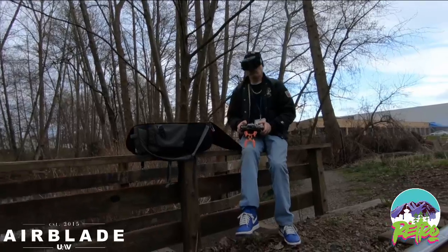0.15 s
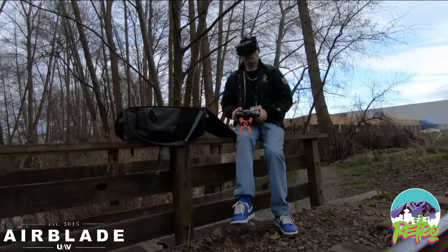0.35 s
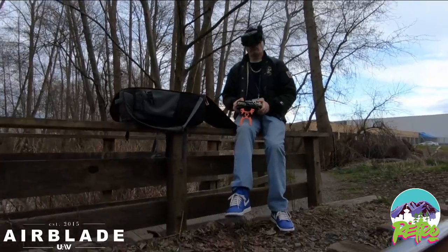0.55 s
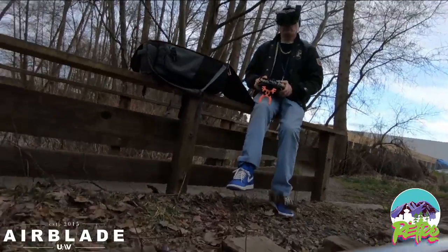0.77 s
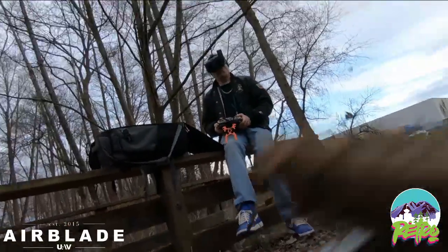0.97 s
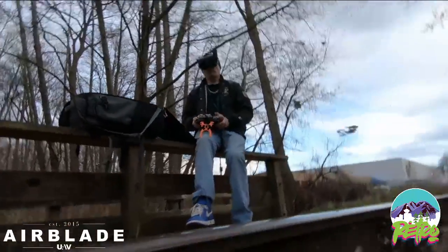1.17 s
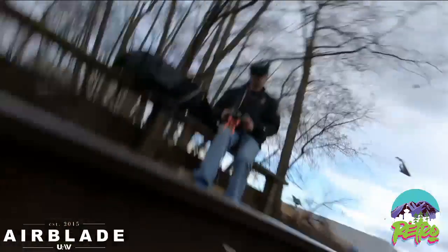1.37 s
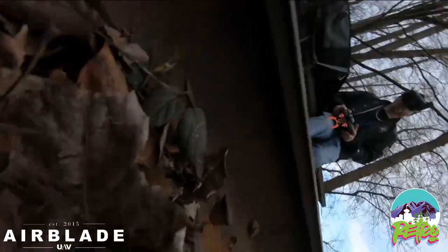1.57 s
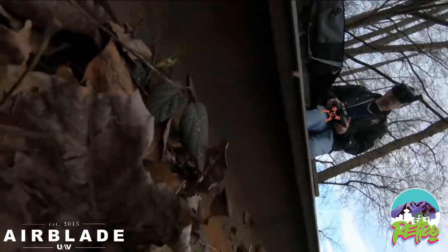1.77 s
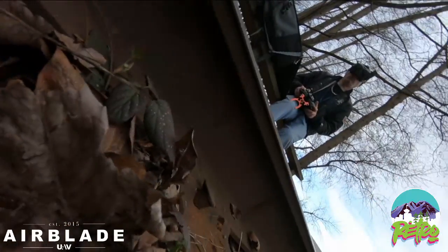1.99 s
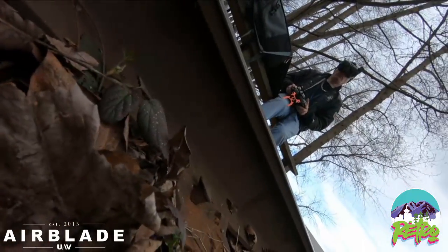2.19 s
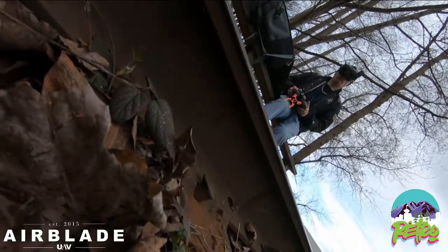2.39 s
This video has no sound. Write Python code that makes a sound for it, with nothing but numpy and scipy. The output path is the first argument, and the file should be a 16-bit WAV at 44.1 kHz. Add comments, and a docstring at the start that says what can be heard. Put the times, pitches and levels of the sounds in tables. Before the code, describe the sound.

Small four-motor drone hums close by, clips something, spins down and thuds into dry rustling leaves.

```python
"""Woodland path: a small four-motor drone, heard from its own camera, hovers low; a second one flies past.
Two-blade rotors beat as sines at multiples of shaft speed, with chopped noise for air and plain noise for wash.
It grazes something, the motors fight and spin down, and it knocks on the ground: noise bursts, ringing modes.
It slides into dry leaves, which crackle as random grains and single snaps over a low rumble while it settles."""
import sys
import numpy as np
from scipy import signal
from scipy.fft import rfft, irfft
from scipy.io import wavfile
from scipy.ndimage import uniform_filter1d

SR = 44100
rng = np.random.default_rng(int(sys.argv[2]) if len(sys.argv) > 2 else 0)


def materialize(psi):
    """Save the field psi as 16-bit PCM at rate SR to the path in sys.argv[1].

    A 1-D psi becomes a single channel; in a 2-D psi each row is a channel.
    """
    bounded = np.clip(np.atleast_2d(psi).T, -1, 1)
    quanta = np.round(bounded * 32767).astype(np.int16)
    wavfile.write(sys.argv[1], SR, quanta)


N = 107559
T = np.arange(N) / SR

# Spectra are relative: colour() normalises their power.
# second drone: [t/s, blade tone f/Hz before jitter, level/dB]
OTHER_DRONE = [(.78, 471, -66), (.88, 493.4, -45), (.95, 498.6, -39.5), (1, 474, -50.5), (1.05, 432.5, -34),
               (1.1, 450, -52.5), (1.15, 450, -70.5)]
# prop wash spectrum: [f/Hz, density/dB]
WASH_SPECTRUM = [(25, -12), (60, -14), (110, -9), (180, 9), (270, -1.5), (450, 13), (650, -9), (1000, -17),
                 (3000, -38), (15000, -85)]
# gusts of wash and bumps on the camera: [t/s, rise/s, decay/s, level/dB]
BUMPS = [(0.939, 0.044, .018, -37.5), (1.1, .015, .02, -34.5), (1.191, 0.016, .03, -41),
         (1.275, .012, .01, -40.5), (1.51, .012, 0.031, -42)]
# gust spectrum at the microphone: [f/Hz, density/dB]
GUST_SPECTRUM = [(25, -4.5), (60, 0.5), (100, -3.5), (160, -5.5), (260, -10), (480, -20.5), (1000, -36.5),
                 (5000, -68), (15000, -90)]

# sliding and settling in leaves: [t/s, rustle level/dB before jitter, frame rumble level/dB]
SLIDE = [(1.33, -58, -53), (1.352, -45.5, -23.5), (1.385, -55.5, -40), (1.445, -56.5, -62),
         (1.458, -39.5, -44.5), (1.495, -39, -38), (1.512, -50, -46.5), (1.56, -58.5, -56),
         (1.65, -61, -55.5), (1.73, -66, -60), (1.76, -72.5, -62), (1.84, -72, -56.5), (1.9, -62.5, -59.5),
         (2.02, -68.5, -59.5), (2.14, -70, -63), (2.22, -86, -67.5), (2.28, -90, -69.5),
         (2.33, -87.5, -63.5), (2.44, -84, -62)]
# single leaf snaps: [t/s, snap level/dB, low thump level/dB, snap decay/s]
SNAPS = [(1.486, -43, -55, .002), (1.491, -33.5, -51, .002), (1.518, -40, -63, .002),
         (1.592, -50.5, -55, 0.0027), (1.664, -44.5, -65, 0.0015), (1.676, -40, -55, 0.0027),
         (1.701, -50, -65, 0.0023), (1.721, -51.5, -62, 0.0023), (1.787, -57.5, -66, 0.0054),
         (1.881, -55.5, -64, .004), (1.895, -55.5, -74, .003), (1.91, -64, -75, 0.0018),
         (1.944, -48.5, -46.5, 0.004), (2.069, -51.5, -75, 0.0025), (2.126, -48, -43.5, 0.0026),
         (2.152, -59.5, -68.5, 0.0043), (2.323, -76.5, -68, .002), (2.377, -69.5, -70.5, .002)]
# rustling leaf spectrum: [f/Hz, density/dB]
LEAF_SPECTRUM = [(200, -4), (500, 7), (1000, -12.5), (2000, -4), (3200, 0.5), (4500, -1.5), (6000, 3.5),
                 (8000, -6), (10000, -20), (12000, -38.5), (15000, -37.5)]
# snapping leaf spectrum: [f/Hz, density/dB]
SNAP_SPECTRUM = [(200, -13), (600, -15), (1200, -13), (2400, -7), (4300, 0), (5300, 2), (6400, 5.5),
                 (8000, -8.5), (10000, -21), (12000, -38), (15000, -37)]
# low frame rumble spectrum: [f/Hz, density/dB]
RUMBLE_SPECTRUM = [(25, -1), (60, 2.5), (100, 2.5), (200, 2), (300, -13.5), (480, -14), (700, -29),
                   (1500, -33.5), (6000, -48.5), (12000, -58.5)]

# sliding frame hum: [t/s, level/dB]
SCRAPE = [(1.36, -80), (1.385, -50.5), (1.44, -50), (1.48, -58), (1.52, -62), (1.6, -77)]
# frame modes: [f/Hz, relative level/dB, t60/s]; strikes detune them slightly
FRAME_MODES = [(310, -2, 0.042), (464, 4, 0.08), (574, -4.5, 0.013), (657, -11, 0.092)]
# camera on its soft mount, modes: [f/Hz, relative level/dB, t60/s]; strikes detune them slightly
MOUNT_MODES = [(57.3, -6, .06), (134.3, -4.5, .05), (190, -1, 0.06)]
# knocks, first is the graze: [t/s, thud and mount level/dB, crack level/dB, frame ring level/dB, crack decay/s]
KNOCKS = [(1.07, -55.5, -29.5, -44.5, 0.0096), (1.3557, -22, -36, -37.5, 0.0018),
          (1.363, -23, -25, -32, .0012), (1.366, -25.5, -41, -35, 0.0016), (1.401, -51, -64, -38.5, 0.0058),
          (1.427, -57, -35.5, -34, 0.0055), (1.432, -61, -37, -33.5, .003)]
# dull thud spectrum: [f/Hz, density/dB]
THUD_SPECTRUM = [(25, -3), (60, 0), (100, -4), (160, 10), (240, -8.5), (480, -12.5), (800, -20.5),
                 (1500, -33), (5000, -60), (15000, -90)]
# crack spectrum: [f/Hz, density/dB]
CRACK_SPECTRUM = [(200, -2), (600, 3), (1200, -3), (2600, -0.5), (5500, -4), (8000, -11), (11000, -38),
                  (15000, -60)]

# shaft speeds before wobble and braking: [t/s, speed/(turns/s)]
SPEED_A = [(0, 179), (.11, 176), (.23, 182), (.31, 191.5), (.36, 190.5), (.45, 193), (.57, 194),
           (.61, 188.7), (.68, 192.5), (.75, 192.5), (.78, 197.5), (.84, 198.7), (.885, 206.5),
           (.93, 205.5), (.98, 196.5), (1.09, 196.5), (1.13, 184), (1.19, 192), (1.265, 168)]
SPEED_B = [(0, 198.9), (0.091, 200.7), (0.189, 199.3), (.25, 189.1), (0.312, 186.7), (0.428, 195.5),
           (0.479, 190), (0.539, 191.6), (0.599, 187.4), (0.719, 187.2), (.78, 179.5), (.88, 172.9),
           (1, 189.4), (1.05, 199.4), (1.15, 172), (1.191, 129.3), (1.264, 115.5)]
SPEED_C = [(0, 211.9), (0.099, 217), (0.261, 210.1), (0.299, 203.9), (.48, 202), (0.681, 195), (.86, 200),
           (0.998, 196), (1.06, 207.2), (1.11, 185.5), (1.17, 217.2), (1.211, 234.5), (1.264, 213.8)]
SPEED_D = [(0, 178), (.3, 176), (.42, 182), (.6, 181), (.8, 186), (.9, 184), (1, 180), (1.09, 170),
           (1.15, 210), (1.19, 308), (1.215, 330), (1.265, 270)]
# motor tones at the microphone, before jitter and braking: [t/s, blade tone level/dB, third blade harmonic level/dB]
TONES_A = [(0, -25, -58), (.2, -24.5, -51), (.33, -30, -48.5), (.6, -29.5, -50), (.9, -29.5, -50),
           (1.05, -30.5, -47), (1.09, -36.5, -52.5), (1.14, -27, -51.5), (1.2, -34.5, -58),
           (1.26, -29.5, -55.5)]
TONES_B = [(0, -40, -40), (.18, -34.5, -43), (0.302, -37.5, -45.5), (.5, -34, -44), (.7, -44, -50.5),
           (.9, -36.5, -45.5), (1.12, -38.5, -45.5), (1.2, -38, -64), (1.26, -37, -53.5)]
TONES_C = [(0, -34, -43), (.15, -47.5, -40.5), (.33, -40, -45.5), (.6, -44, -53.5), (.9, -40, -56.5),
           (1.06, -43.5, -50), (1.15, -39, -46.5), (1.205, -24, -58.5), (1.26, -37, -50.5)]
TONES_D = [(0, -52, -66), (.4, -33, -58.5), (.7, -43, -64), (1, -42.5, -53), (1.1, -46, -45.5),
           (1.16, -42, -49), (1.21, -52, -38.5), (1.26, -50.5, -42.5)]
# base levels, one row a motor: [shaft tone level/dB, overtone group level/dB, buzz trim/dB]
MOTOR_LEVELS = [(-59.5, -53.5, -2), (-63, -62.5, -1.5), (-60.5, -64, 0), (-57, -58, -2.5)]
# overtones: [order/(multiple of shaft speed), level/dB relative to the group]
OVERTONES = [(3, -3), (4, -2), (8, -11.5)]
# motor whine: [order/(multiple of shaft speed), level/dB before treble]
WHINE = [(18, -51), (24, -53.5)]
# bearing whine of motor A, before jitter and braking: [t/s, level/dB]
BEARING = [(0, -47.5), (.25, -47), (.45, -41.5), (.8, -40), (.9, -39.5), (.98, -37.5), (1.06, -36.5),
           (1.12, -41.5), (1.17, -57)]
# whine and buzz trim: [t/s, level/dB]
TREBLE = [(0, -1), (.27, -0.5), (.42, 1), (.8, 1), (1.04, .5), (1.08, 4), (1.13, 2), (1.2, 1.5),
          (1.26, -0.5), (1.3, -3)]
# buzz and chopped air spectrum: [f/Hz, density/dB]
BUZZ_SPECTRUM = [(500, -20), (900, -16), (1600, -14.5), (2000, -9.5), (2400, 0), (3300, 1), (4600, 1),
                 (5200, -2.5), (6500, -4), (8000, -12.5), (10000, -25), (12000, -45), (15000, -51.5)]
# motor bell resonances: [f/Hz, density/dB]
BELL_SPECTRUM = [(1000, -20), (2000, -9.5), (3200, -7.5), (4100, -2.5), (4800, -8.5), (5500, -2),
                 (6100, -11), (8000, -12), (10000, -34), (14000, -60)]
# whine of a motor driven hard: [order/(multiple of shaft speed), level/dB before bell and trim]
STRAIN = [(12, -44.5), (17, -39), (18, -39.5)]
# magnet cogging: [order/(multiple of shaft speed), level/dB before bell and trim]
COGGING = [(42, -55.5), (84, -47.5)]

WASH_MEAN_DB = -46
BASE_GRAINS_PER_S, SLIDE_GRAINS_PER_S, FULL_SLIDE_DB = 990, 8100, -42.5
GRAIN_SPREAD_DB, SMOOTH_SHARE = 2.5, .1
SCRAPE_Q = 11
THUD_DECAY_S, THUD_NOISE_TRIM_DB = .0065, -6
# wobble: rms fraction of shaft speed
WOBBLE, UPSET_WOBBLE, UPSET_RAMP_S = .002, .016, .057
CUT_S, BRAKE_S, STOP_S = 1.26, .031, 1.35
SPEED_POWER = 1.3  # loudness exponent of braking
FLUTTER_RMS_DB = 4
BUZZ_BASE_DB, AIR_BASE_DB, CHOP_DEPTH = -45, -42.5, .75
BEARING_ORDER = 15.32
STRAIN_FROM_TURNS_PER_S, STRAIN_SPAN_TURNS_PER_S, STRAIN_TRIM_DB = 215, 80, -8
TOP_HZ = 15100


def undb(db):
    """Decibels to gain."""
    return 10 ** (np.asarray(db) / 20)


def unit(x):
    """Scale to rms 1."""
    return x / np.sqrt(np.mean(x ** 2) + 1e-18)


def curve(rows, axis=1):
    """Linear interpolation of one table column over time."""
    rows = np.array(rows)
    return np.interp(T, rows[:, 0], rows[:, axis])


def ramp(start_s, span_s):
    """Linear 0 to 1 from the start over the span."""
    return np.clip((T - start_s) / span_s, 0, 1)


def fade_out(end_s, span_s):
    """Linear 1 to 0 over the span before the end."""
    return np.clip((end_s - T) / span_s, 0, 1)


def walk(rate_hz):
    """Smoothed sample-and-hold chance, rms 1."""
    k = max(int(SR / rate_hz), 1)
    held = rng.standard_normal(2000)[np.arange(N) // k]
    return unit(uniform_filter1d(held, k))


def colour(x, spectrum):
    """Minimum-phase filter with the given spectrum; white noise keeps its power."""
    hz, db = np.array(spectrum).T
    size = 4096
    bins_hz = np.arange(size // 2 + 1) * SR / size
    gain = unit(undb(np.interp(np.log(bins_hz + 1), np.log(hz), db)))
    # folding the cepstrum makes the response causal
    cepstrum = irfft(np.log(gain))
    cepstrum[1:size // 2] *= 2
    cepstrum[size // 2 + 1:] = 0
    impulse = irfft(np.exp(rfft(cepstrum)))
    return signal.fftconvolve(x, impulse)[:N]


def noise():
    """White noise, rms 1."""
    return rng.standard_normal(N)


def burst(at_s, decay_s, rise_s=.00033):
    """Envelope with exponential swell to 1 and exponential decay."""
    return np.exp(np.minimum((T - at_s) / rise_s, (at_s - T) / decay_s))


def ring(at_s, modes):
    """Damped sines of a body struck at a moment, each slightly detuned."""
    age = np.maximum(T - at_s, 0)
    total = np.zeros(N)
    for hz, db, t60 in modes:
        struck_hz = hz * (1 + .0067 * rng.standard_normal())
        decay = np.exp(-np.log(1000) * age / t60)
        total -= undb(db) * np.sin(2 * np.pi * struck_hz * age) * decay
    return total


def other_drone():
    """Blade tone of a second drone: one sine gliding and swelling as it goes by."""
    hz = curve(OTHER_DRONE) * (1 + .013 * walk(73))
    tone = np.sqrt(2) * np.sin(2 * np.pi * np.cumsum(hz) / SR)
    fade = ramp(OTHER_DRONE[0][0], .02) * fade_out(OTHER_DRONE[-1][0], .02)
    return tone * undb(curve(OTHER_DRONE, axis=2)) * fade


def prop_wash():
    """Downwash buffeting the microphone: low noise of wandering level."""
    level = undb(WASH_MEAN_DB + 4.5 * walk(4))
    return level * colour(noise(), WASH_SPECTRUM) * fade_out(1.34, .056)


def camera_bumps():
    """Gusts and bumps on the camera: swelling bursts of low noise."""
    envelope = sum(undb(db) * burst(at, decay, rise) for at, rise, decay, db in BUMPS)
    return envelope * colour(noise(), GUST_SPECTRUM)


def leaf_rustle():
    """Dry leaves scraping: random impulses, denser as the slide gets louder, over a little smooth noise."""
    slide_share = np.minimum(undb(curve(SLIDE) - FULL_SLIDE_DB), 1)
    rate = BASE_GRAINS_PER_S + SLIDE_GRAINS_PER_S * slide_share
    sizes = undb(GRAIN_SPREAD_DB * np.minimum(rng.exponential(size=N), 4))
    hits = (rng.random(N) < rate / SR) * np.sign(noise())
    grains = unit(hits * sizes / np.sqrt(rate))  # power independent of density
    rustle = (grains + SMOOTH_SHARE * noise()) * undb(curve(SLIDE) + 1.5 * walk(100))
    return colour(rustle, LEAF_SPECTRUM)


def frame_rumble():
    """Low rumble of the frame in the leaves, with a thump at each snap."""
    thumps = sum(undb(db) * burst(at, .0044) for at, _, db, _ in SNAPS)
    return (undb(curve(SLIDE, axis=2)) + thumps) * colour(noise(), RUMBLE_SPECTRUM)


def leaf_snaps():
    """Single leaves snapping: short bright noise bursts."""
    envelope = sum(undb(db) * burst(at, decay, rise_s=.0013) for at, db, _, decay in SNAPS)
    return colour(envelope * noise(), SNAP_SPECTRUM)


def leaves():
    """Rustle, rumble and snaps as the frame slides and settles."""
    return leaf_rustle() + frame_rumble() + leaf_snaps()


def scrape():
    """Friction keeps the frame's modes ringing: noise through resonators."""
    drive = noise()
    body = np.zeros(N)
    for hz, db, _ in FRAME_MODES:
        body += undb(db) * signal.lfilter(*signal.iirpeak(hz, SCRAPE_Q, fs=SR), drive)
    return unit(body) * undb(curve(SCRAPE)) * fade_out(SCRAPE[-1][0], .04)


def crash():
    """Each contact thumps the camera, cracks and rings the frame."""
    thuds, cracks, rings = np.zeros((3, N))
    for at, thud_db, crack_db, ring_db, decay in KNOCKS:
        thuds += undb(thud_db + THUD_NOISE_TRIM_DB) * burst(at, THUD_DECAY_S)
        cracks += undb(crack_db) * burst(at, decay)
        rings += undb(thud_db) * ring(at, MOUNT_MODES)
        rings += undb(ring_db) * ring(at, FRAME_MODES)
    return colour(thuds * noise(), THUD_SPECTRUM) + colour(cracks * noise(), CRACK_SPECTRUM) + rings


def shaft(speeds):
    """Rotor speed, angle and braking: it hunts after the graze and brakes hard once the throttle is cut."""
    brake = np.exp(-np.clip(T - CUT_S, 0, .3) / BRAKE_S)
    wobble = WOBBLE + UPSET_WOBBLE * ramp(KNOCKS[0][0], UPSET_RAMP_S)
    steady = uniform_filter1d(curve(speeds), SR // 80, mode="nearest")
    speed = steady * (1 + wobble * walk(110)) * brake
    turn = 2 * np.pi * (np.cumsum(speed) / SR + rng.random())
    return speed, turn, brake


def tone(turn, order):
    """Sine locked to a multiple of the shaft angle, rms 1, random phase."""
    return np.sqrt(2) * np.sin(order * turn + 2 * np.pi * rng.random())


def flutter():
    """Random level flutter of one partial."""
    return undb(FLUTTER_RMS_DB * walk(35.11))


def partials(turn, rows):
    """Sum of shaft-locked tones, each fluttering on its own."""
    return sum(undb(db) * tone(turn, order) * flutter() for order, db in rows)


def blade_tones(speed, turn, tones, shaft_db, overtone_db):
    """Two blades sound at twice shaft speed, with harmonics; the shaft tone grows at high speed."""
    blade = undb(curve(tones) + 1.1 * walk(30)) * tone(turn, order=2)
    third = undb(curve(tones, axis=2)) * tone(turn, order=6)
    overspeed = np.maximum(speed / 192, 1) ** 1.8
    once_a_turn = undb(shaft_db) * tone(turn, order=1) * flutter() * overspeed
    return blade + third + once_a_turn + undb(overtone_db) * partials(turn, OVERTONES)


def whine_and_buzz(turn, buzz_db):
    """Motor whine, a comb of high shaft harmonics, and air noise chopped by the blades."""
    # odd orders lie 4 dB lower
    comb = sum(tone(turn, k) * flutter() * undb(-4. * (k % 2)) for k in range(7, 64))
    air = noise() * (1 + CHOP_DEPTH * np.cos(2 * turn))
    mix = undb(BUZZ_BASE_DB) * unit(comb) + undb(AIR_BASE_DB) * unit(air)
    buzz = undb(buzz_db) * colour(mix, BUZZ_SPECTRUM)
    return (partials(turn, WHINE) + buzz) * undb(curve(TREBLE))


def strain(speed, turn):
    """A motor driven hard whines through its bell, fading in with speed."""
    amount = np.clip((speed - STRAIN_FROM_TURNS_PER_S) / STRAIN_SPAN_TURNS_PER_S, 0, 1)
    return colour(partials(turn, STRAIN), BELL_SPECTRUM) * amount * undb(STRAIN_TRIM_DB)


def cogging(turn, brake):
    """Magnets cog at high shaft orders after the throttle cut, ringing the bell."""
    rough = partials(turn, COGGING) * undb(4.55 * walk(300) - 1)
    return colour(rough, BELL_SPECTRUM) * ramp(CUT_S, .012) * brake ** .45


def motor(speeds, tones, shaft_db, overtone_db, buzz_db, bearing_gain):
    """One rotor: driven sounds weaken as it brakes, cogging fades in, all stops."""
    speed, turn, brake = shaft(speeds)
    driven = blade_tones(speed, turn, tones, shaft_db, overtone_db)
    driven += whine_and_buzz(turn, buzz_db)
    driven += bearing_gain * tone(turn, BEARING_ORDER) * undb(.4 * walk(30))
    driven += strain(speed, turn)
    return (brake ** SPEED_POWER * driven + cogging(turn, brake)) * fade_out(STOP_S, .014)


def flight():
    """Four rotors beating at slightly different speeds, with wash; only motor A has bearing whine."""
    speeds = (SPEED_A, SPEED_B, SPEED_C, SPEED_D)
    tones = (TONES_A, TONES_B, TONES_C, TONES_D)
    bearings = (undb(curve(BEARING)), 0, 0, 0)
    rows = zip(speeds, tones, MOTOR_LEVELS, bearings)
    rotors = sum(motor(speed, tone_rows, *levels, bearing) for speed, tone_rows, levels, bearing in rows)
    return rotors + prop_wash() + camera_bumps()


def scene():
    """All sources summed at one microphone."""
    return (flight() + other_drone() + crash() + scrape() + leaves())[None]


def record(dry):
    """The camera cuts the top: steep elliptic low-pass."""
    return signal.sosfilt(signal.ellip(8, .2, 70, TOP_HZ, fs=SR, output="sos"), dry)


dry = scene()
out = record(dry)
materialize(out)
```